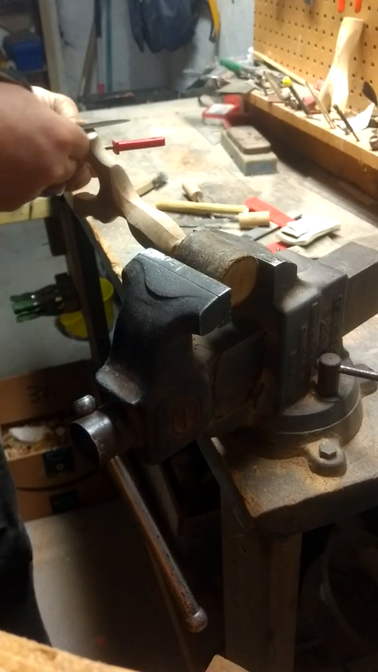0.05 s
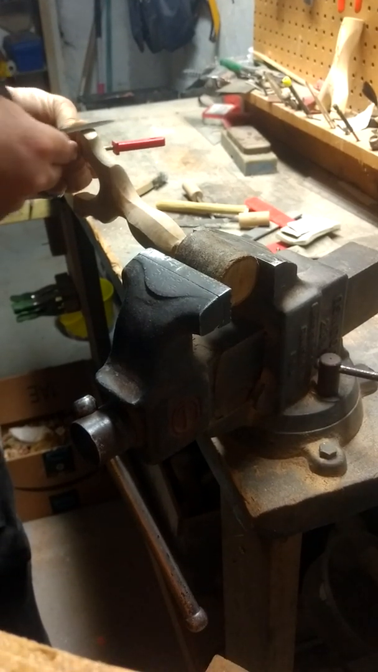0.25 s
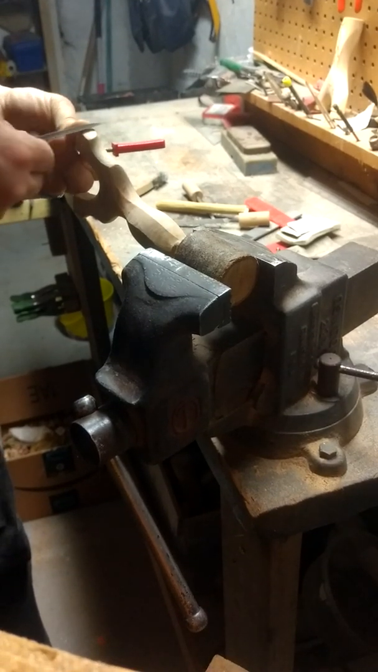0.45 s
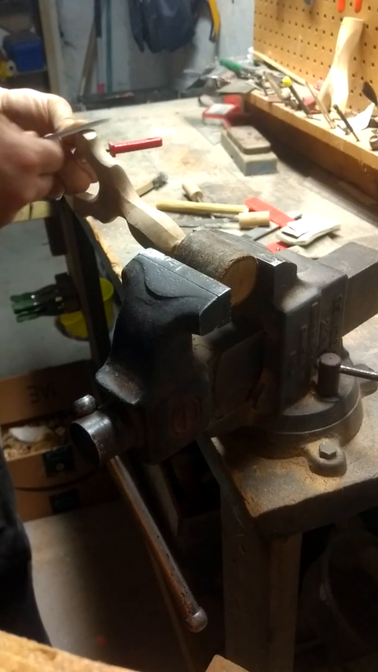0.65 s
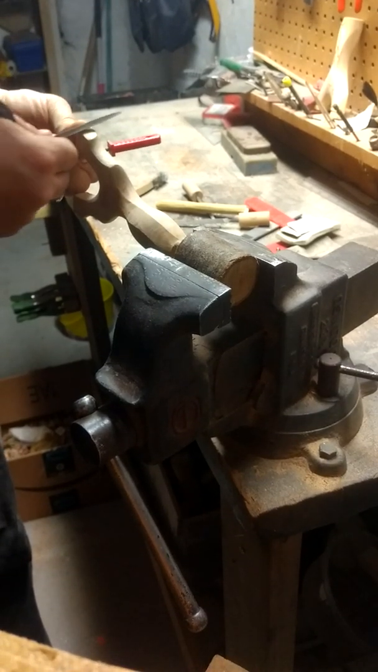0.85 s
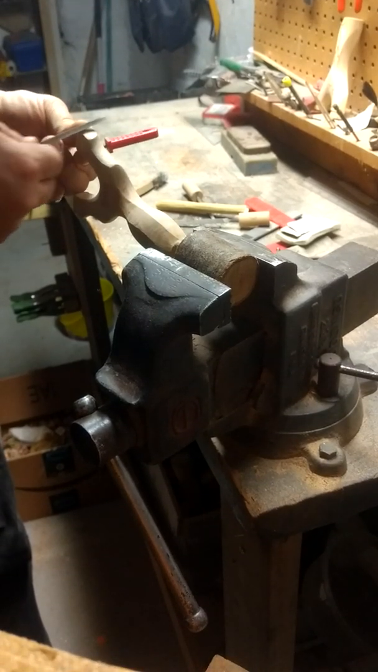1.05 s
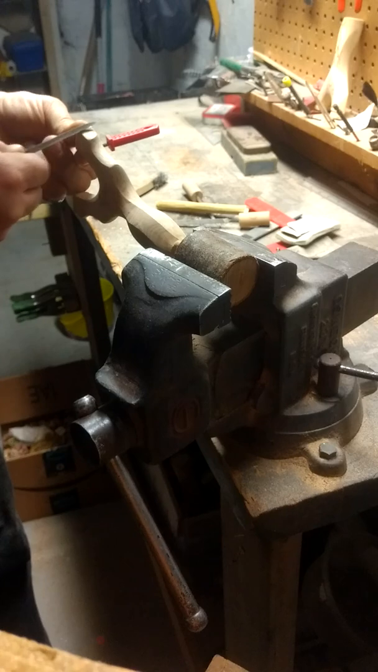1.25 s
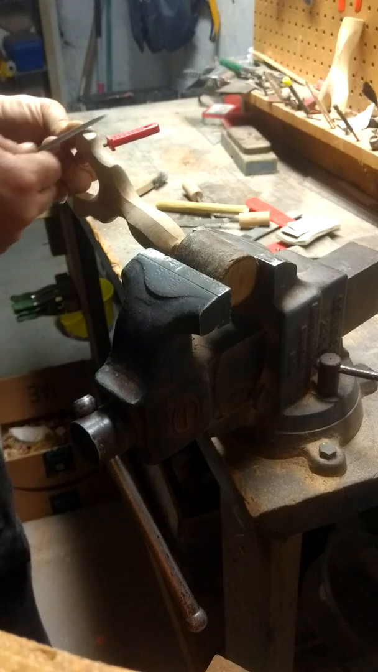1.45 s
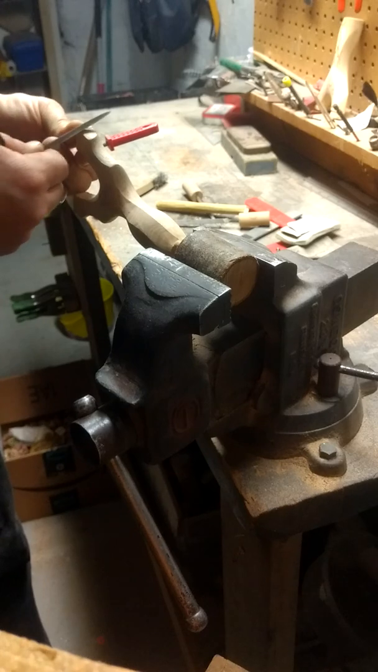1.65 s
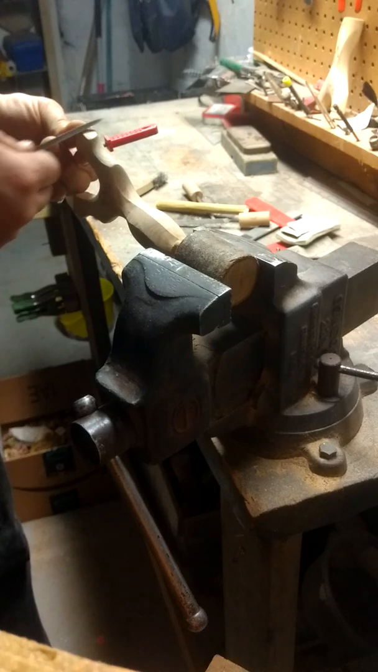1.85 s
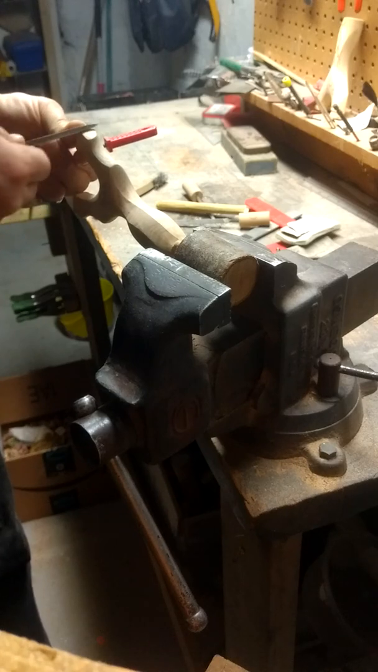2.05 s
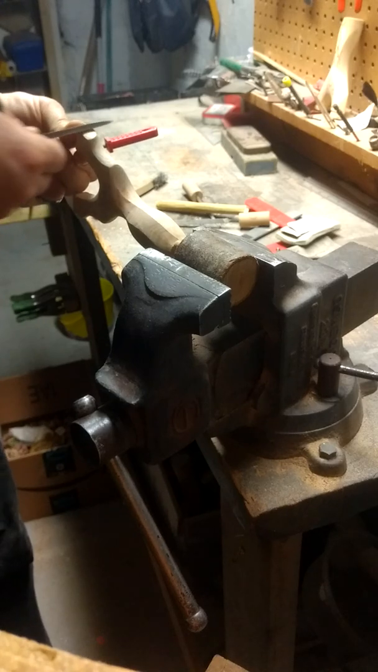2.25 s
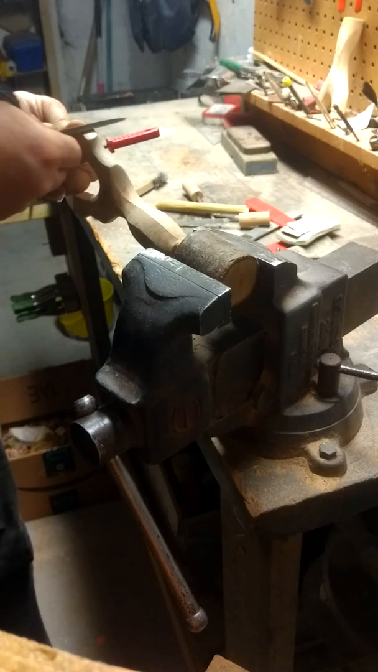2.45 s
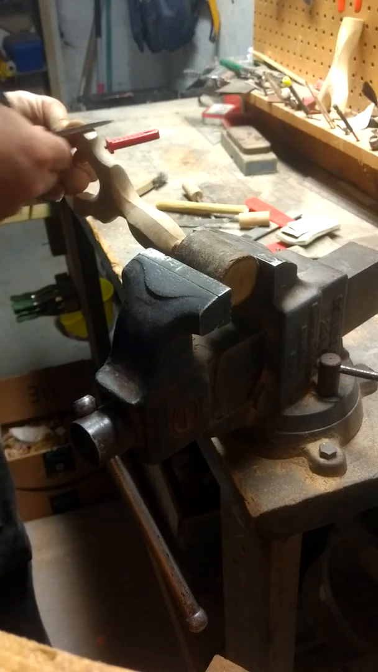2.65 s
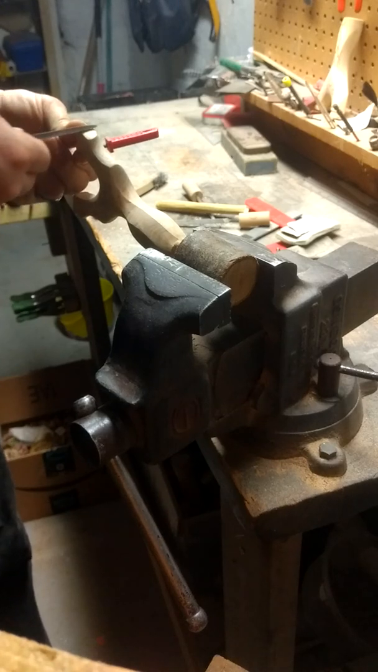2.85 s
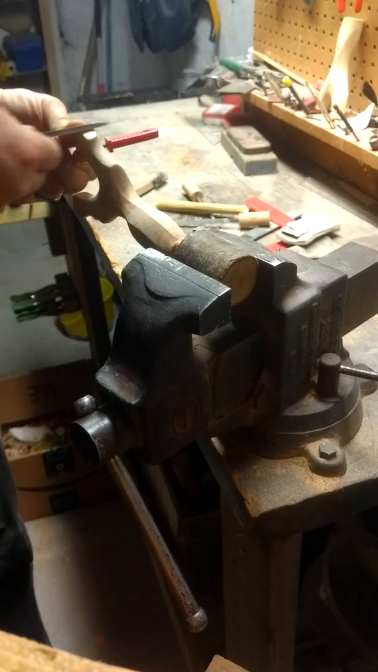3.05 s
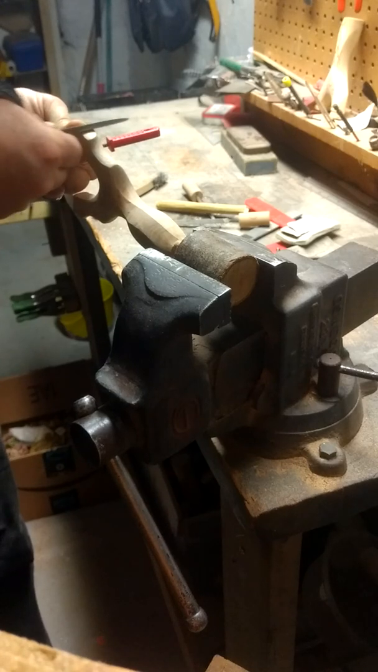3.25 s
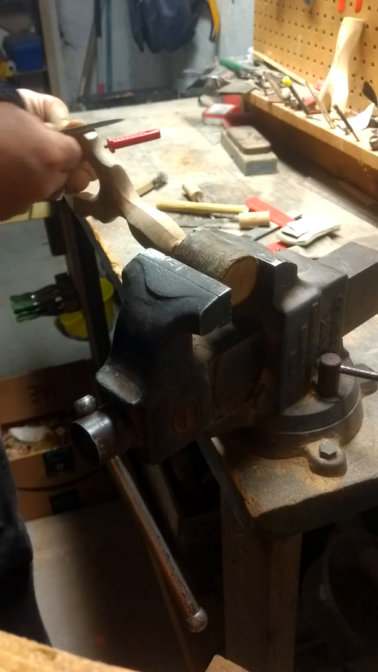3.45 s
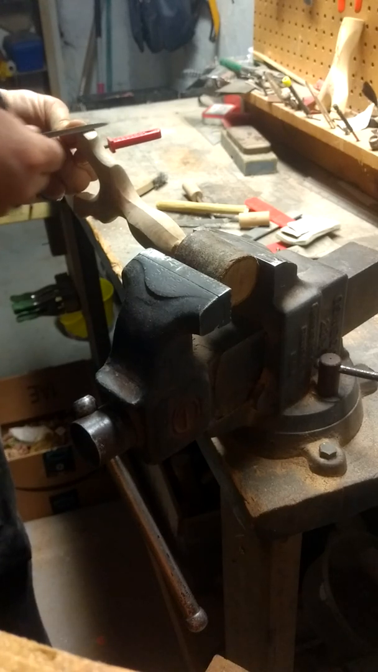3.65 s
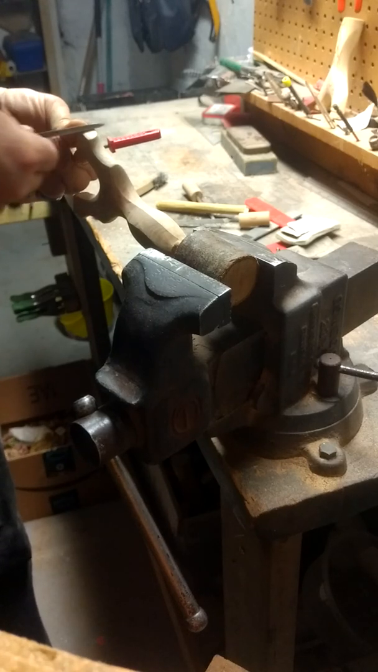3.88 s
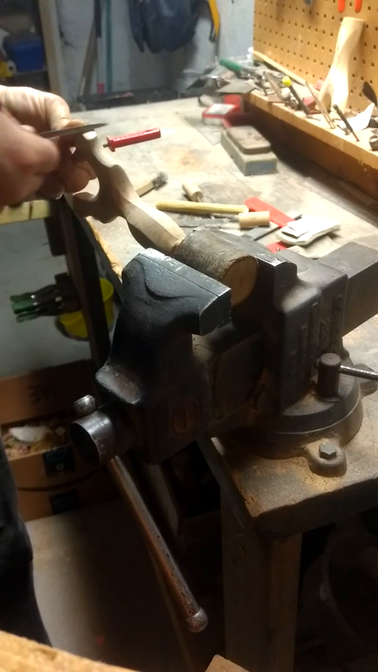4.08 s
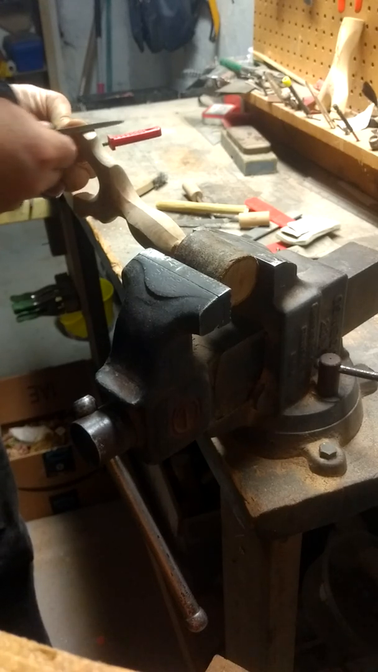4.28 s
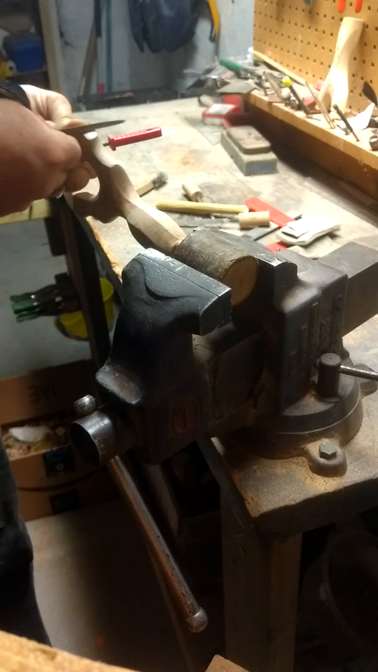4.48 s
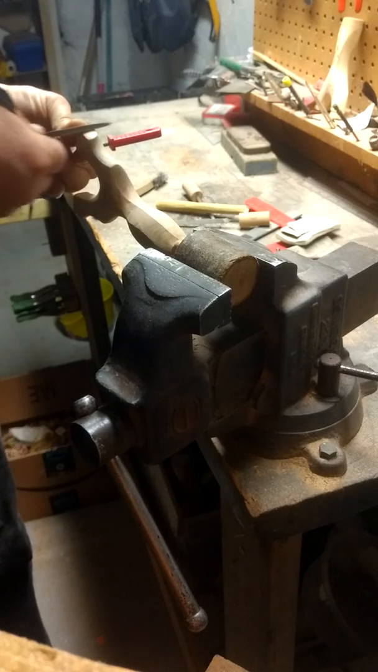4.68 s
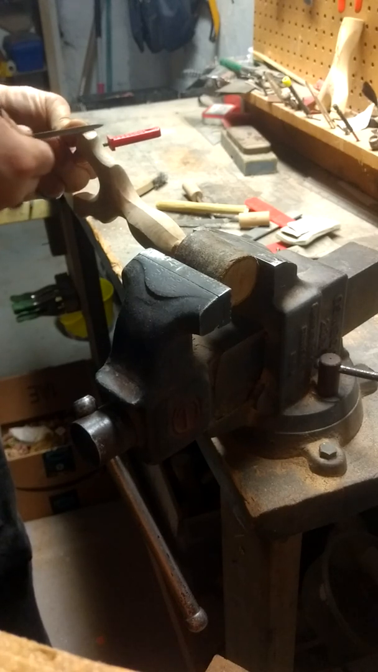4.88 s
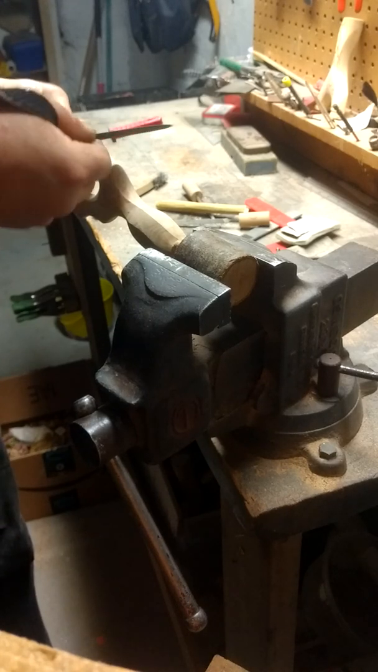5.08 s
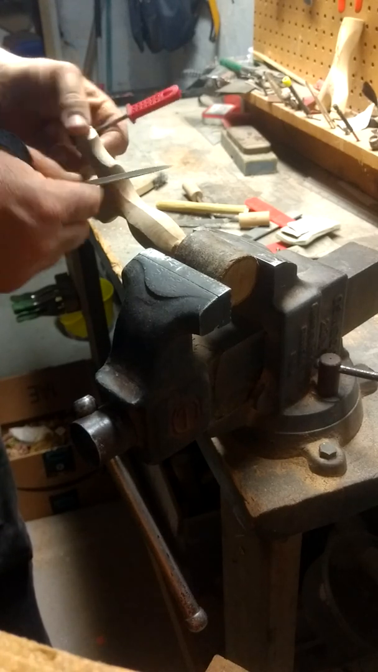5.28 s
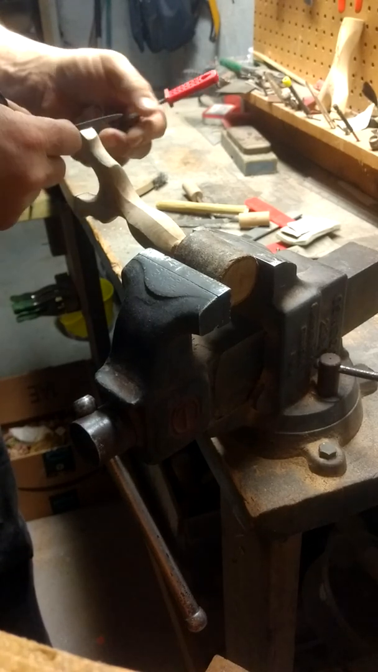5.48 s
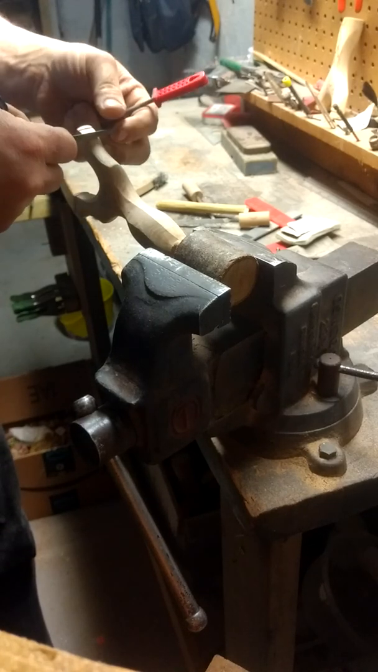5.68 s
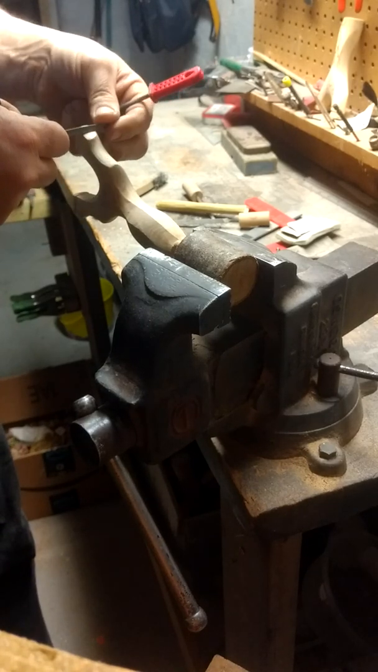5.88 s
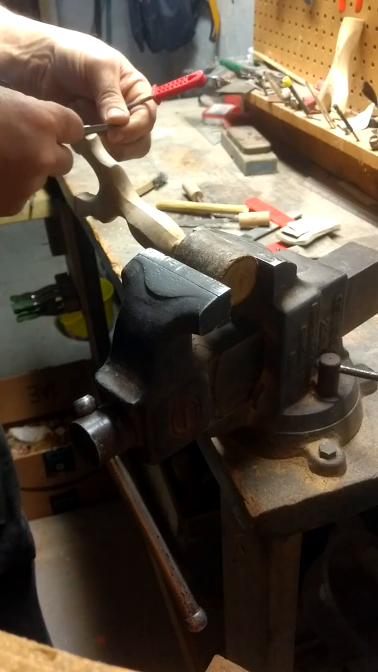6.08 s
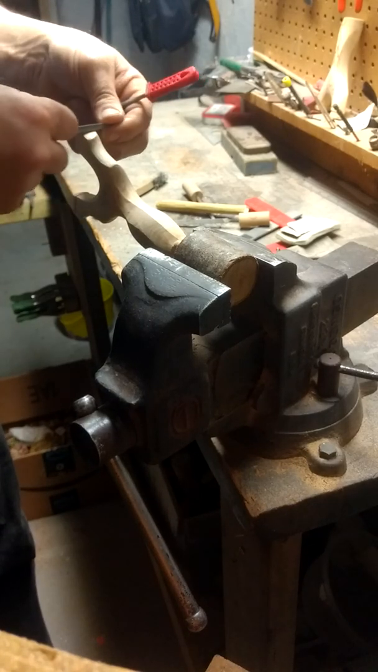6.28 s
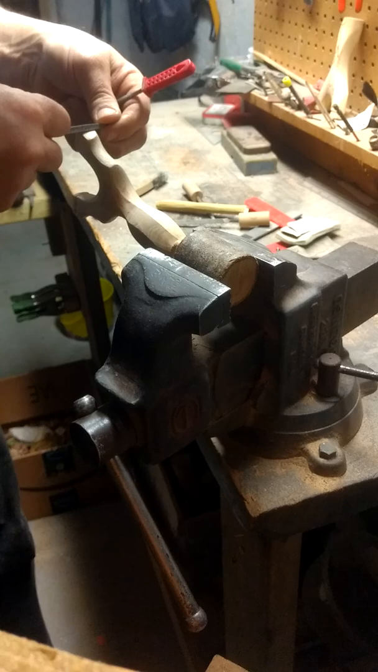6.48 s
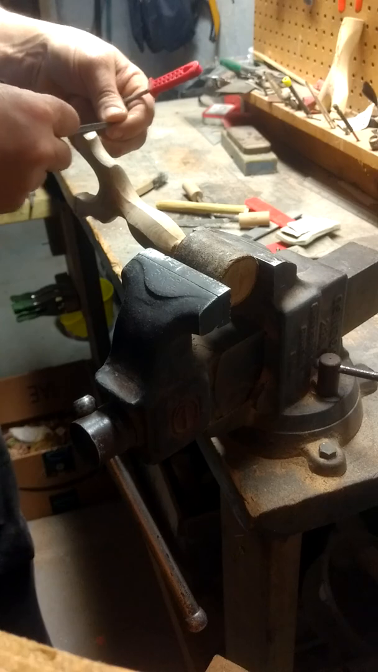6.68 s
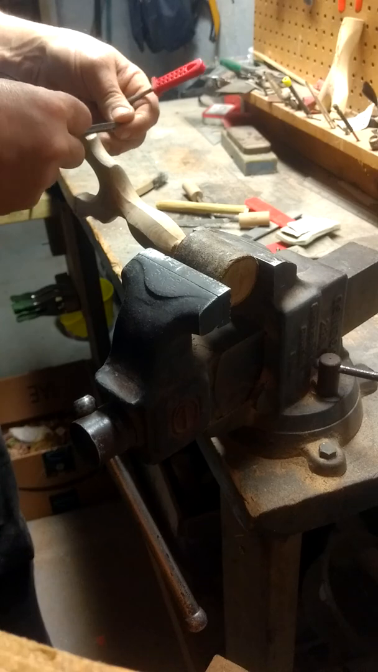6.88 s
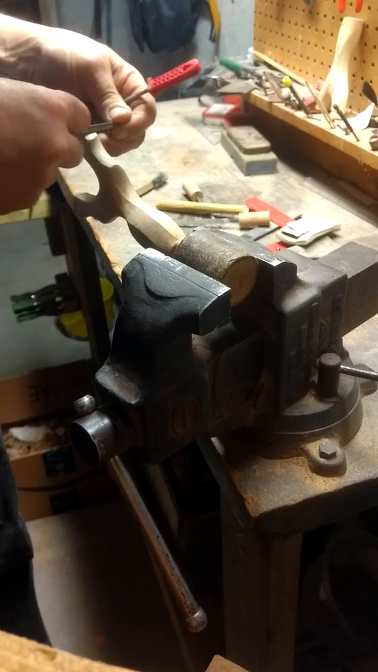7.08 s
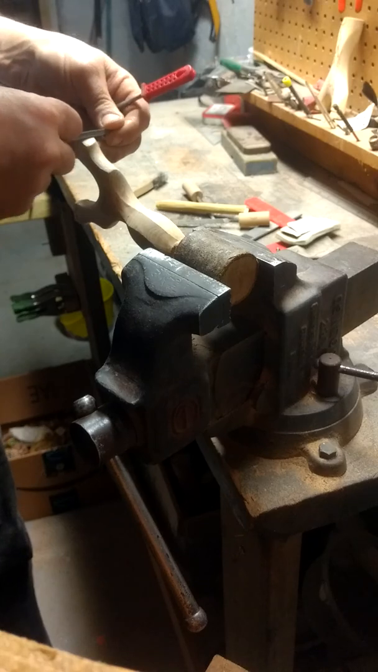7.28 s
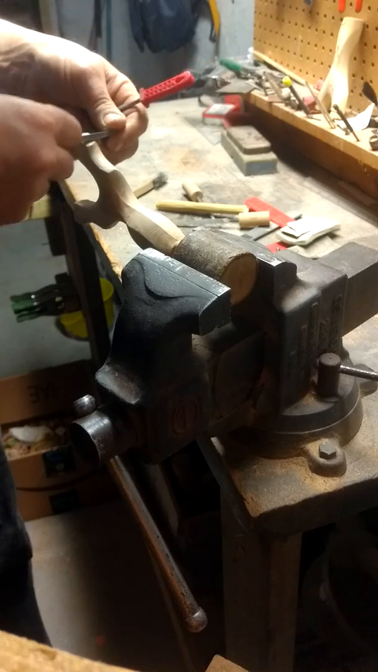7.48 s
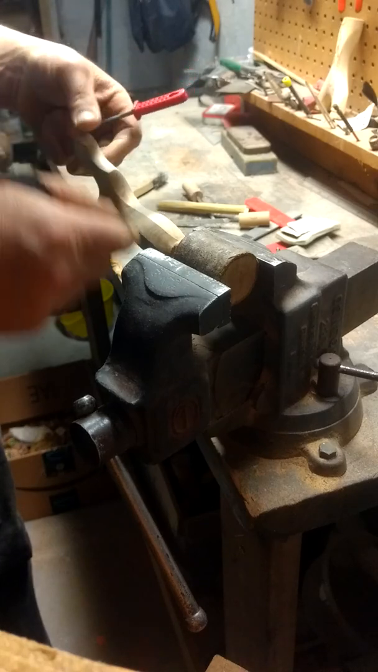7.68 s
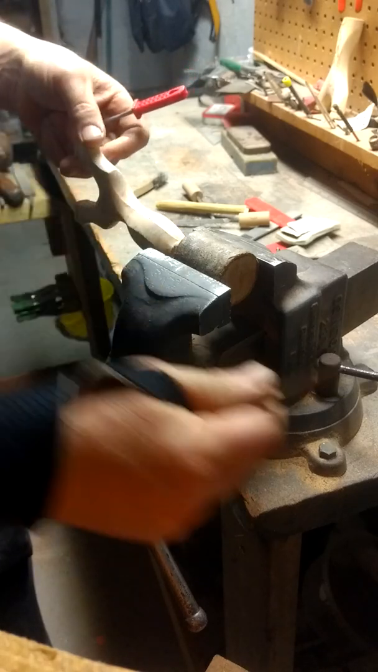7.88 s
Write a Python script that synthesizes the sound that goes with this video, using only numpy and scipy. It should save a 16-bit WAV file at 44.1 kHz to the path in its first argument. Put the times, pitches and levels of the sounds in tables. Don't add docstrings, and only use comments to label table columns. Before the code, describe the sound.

Close in a quiet workshop, a steel file scrapes to and fro on a carved wooden piece held in a vise, about four quick cycles a second. The wood rings hollow with small catches and knocks. After five seconds it stops; fingers slide and tap lightly, then a second, duller and woodier run of filing begins, ending in a soft hand slide.

```python
import sys
import numpy as np
from scipy import signal
from scipy.fft import rfft, irfft, next_fast_len
from scipy.io import wavfile
from scipy.ndimage import uniform_filter1d

SR = 44100
rng = np.random.default_rng(int(sys.argv[2]) if len(sys.argv) > 2 else 0)


def unload_wav(signal):
    wavfile.write(
        sys.argv[1],
        SR,
        np.round(np.clip(np.atleast_2d(signal).T, -1, 1) * 32767).astype(np.int16),
    )


def volts(x):
    e = np.asarray(x, float) / 20
    return 10 ** e


N = 349713
T = np.arange(N) / SR
SIZE = next_fast_len(N + SR)
HZ = np.arange(SIZE // 2 + 1) * SR / SIZE
AT_SECOND_SPOT = T > 5.3
LAST_CYCLE_S = (0.27, 0.29)

# start_s, neck_ring_db, sway_above_ring_db,
# steel_tick_above_ring_db
TAPS = [
    (5.394, -39, -1, -12.5),
    (5.43, -45, -3, -27),
    (5.745, -51, 3.5, -22),
    (5.799, -62, 7, -15),
    (5.902, -66, 8, -6),
    (7.925, -56, 6, -16),
]


def through(x, response):
    return irfft(rfft(x, SIZE) * response, SIZE)[..., :N]


def unit(response):
    return response / np.sqrt(np.mean(np.abs(response) ** 2))


def colour(points):
    hz, db = np.transpose(points)
    return volts(np.interp(np.log(HZ + 1), np.log(hz), db))


def mode(hz, width):
    return 1j * HZ * width / (hz ** 2 - HZ ** 2 + 1j * HZ * width)


def flicker(rate, depth_db):
    hold = int(SR / rate)
    steps = np.repeat(rng.standard_normal(N // hold + 1), hold)[:N]
    return volts(depth_db * uniform_filter1d(steps, hold))


def grit(rate, spread_db):
    excess = np.minimum(rng.exponential(size=N), 3)
    tears = rng.random(N) < rate / SR
    size = volts(spread_db * excess) * rng.standard_normal(N) * tears
    return size / np.sqrt(np.mean(size ** 2))


def strokes():
    # push_start_s, speed_as_rasp_db, push_pressure_db, pull_pressure_db, sway_db
    first_spot = [(0.012, -44, -26, -32.5, -40.5), (0.275, -45.5, -30, -35, -42.5),
                  (0.533, -46.5, -29, -30, -38), (0.802, -45.5, -28.5, -26.5, -37.5),
                  (1.072, -47, -26.5, -32, -35.5), (1.343, -46, -30, -27.5, -39),
                  (1.619, -46, -27.5, -28.5, -36.5), (1.876, -45.5, -28.5, -31, -38),
                  (2.135, -45, -28, -31, -39.5), (2.404, -44, -27.5, -32, -38),
                  (2.664, -43.5, -27.5, -36, -39.5), (2.931, -42.5, -27.5, -30.5, -39),
                  (3.187, -41.5, -26.5, -32, -36), (3.444, -42, -26, -30, -34.5),
                  (3.696, -41.5, -22.5, -30.5, -37), (3.952, -42, -26.5, -31.5, -36.5),
                  (4.21, -41.5, -24.5, -28.5, -36), (4.462, -42.5, -22, -31.5, -36),
                  (4.719, -42.5, -22.5, -30.5, -36), (4.961, -40, -26.5, -99, -41)]
    second_spot = [
        (6.042, -56.5, -36, -35, -37),
        (6.32, -52.5, -28.5, -36.5, -34),
        (6.575, -48.5, -23, -30.5, -29),
        (6.847, -49.5, -24.5, -34, -33),
        (7.106, -49, -23.5, -30.5, -31),
        (7.345, -52.5, -26, -42.5, -33.5),
    ]
    push_share = (0.5, 0.44)
    pull_rasp_db, pull_sway_db = (-2, -7.5), (-2, -5)
    sway_follows = 0.51
    lifted_db = -70
    rows = []
    for spot, table in enumerate((first_spot, second_spot)):
        s, speed_db, push_db, pull_db, sway_db = np.transpose(table)
        cycle = np.diff(s, append=s[-1] + LAST_CYCLE_S[spot])
        push = push_share[spot] * cycle
        rows += zip(s, push, 0 * s, speed_db, push_db, sway_db, spot + 0 * s)
        back_sway_db = sway_db + pull_sway_db[spot] + sway_follows * (pull_db - push_db)
        rows += zip(s + push, cycle - push, 1 + 0 * s, speed_db + pull_rasp_db[spot], pull_db,
                    back_sway_db, spot + 0 * s)
    return np.transpose(sorted(row for row in rows if row[4] > lifted_db))


def by_spot(values):
    _, _, pull, _, _, _, spot = strokes().astype(int)
    values = np.array(values)
    return values[spot] if values.ndim == 1 else values[spot, pull]


def humps(place, db, sharp, rest_db):
    release_s = 0.035
    start, length = strokes()[:2]
    first, count = (start * SR).astype(int), (length * SR).astype(int)
    out = np.zeros(N)
    tail = np.exp(-np.arange(SR // 4) / (release_s * SR))
    rest = volts(rest_db)
    out[:first[0]] = volts(db[0] - 4)
    for s, n, peak, gain, bend in zip(first, count, np.clip(place, 0.1, 0.9), volts(db), sharp):
        angle = np.interp(np.arange(n) / n, [0, peak, 1], [0, np.pi / 2, np.pi])
        out[s:s + n] = gain * (rest + (1 - rest) * np.sin(angle) ** bend)
        out[s + n:s + n + len(tail)] = gain * rest * tail
    return uniform_filter1d(out, 200)


def jolts(times, db, push_ms):
    fade = np.exp(-np.arange(6000) / (push_ms * SR / 1000))
    out = np.zeros(N + len(fade))
    for s, gain in zip(times, volts(db)):
        out[int(s * SR):int(s * SR) + len(fade)] += gain * fade * rng.standard_normal(len(fade))
    return out[:N]


def snags(times, db):
    out = np.zeros(N)
    out[(times * SR).astype(int)] = volts(db) * rng.choice([-1, 1], len(times))
    return out


def shop():
    # pitch_hz, level_db
    air_colour = [(25, -22.5), (60, 8), (200, 5.5), (500, -3), (1300, -6), (1800, -20.5), (9000, -33.5),
                  (16000, -31)]
    # pitch_hz, level_db
    tones = [(10621, -104), (12161, -96), (12931, -100), (13582, -99), (14002, -95)]
    air_db, left_bass_db, right_treble_db = -55.5, 5, 5.5
    lean_db = np.interp(np.log(HZ + 1), np.log([250, 700, 5000, 9000]), [left_bass_db, 0, 0, -right_treble_db])
    lean = volts(np.array([lean_db, -lean_db]) / 2)
    air = through(rng.standard_normal((2, N)), unit(colour(air_colour)) * lean)
    whine = sum(volts(db) * np.sin(2 * np.pi * hz * T) for hz, db in tones)
    return volts(air_db) * air * flicker(0.91, 0.45) + whine


def rasp():
    # pitch_hz, width_hz, level_over_rasp_db
    steel_modes = [(1780, 120, -6.5), (2090, 17, 12), (2496, 107, 8), (3033, 25, 5.5), (3423, 103, 10),
                   (4615, 110, 14), (3737, 96, 6.5), (5870, 180, 3), (6430, 350, 12.5), (7650, 110, 8.5),
                   (8280, 350, 10.5), (7907, 71, 16.5), (9850, 220, 3.5), (12290, 350, 7.5)]
    # pitch_hz, level_db_per_hz
    rasp_colour = [(60, -24), (900, 3), (2300, 4.5), (4600, -6), (6500, -22.5), (7200, -27), (10700, -35.5),
                   (15000, -35)]
    fastest = by_spot(((0.39, 0.43), (0.5, 0.49)))
    speed_db = strokes()[3]
    speed = humps(fastest, speed_db + 5.5, sharp=by_spot((1.66, 1.76)), rest_db=-19.0)
    force = speed * grit(12000, 2.4) * flicker(70, 1.9)
    dulled = through(force * AT_SECOND_SPOT, 1 / (1 + (HZ / 11400) ** 4))
    force = force * ~AT_SECOND_SPOT + dulled
    tap_s, tap_db, _, tick_db = np.transpose(TAPS)
    force = force + np.diff(jolts(tap_s, tap_db + tick_db + 11.5, push_ms=19), prepend=0)
    steel = 0
    for hz, width, db in steel_modes:
        contact = flicker(22, 1.9) * flicker(7, 1.47)
        steel = steel + through(force * contact, mode(hz, width) * (volts(db) - 1))
    return through(force + steel, unit(colour(rasp_colour)))


def upper_share():
    # time_s, share_of_upper_bending_0_to_1
    bearing = [(0.0, 0.26), (0.6, 0.56), (1.14, 0.24), (1.4, .55), (2.0, 0.39), (2.5, 0.69), (3.0, 0.58),
               (3.3, 0.44), (3.75, 0.7), (4.1, 0.57), (4.55, 0.49), (5.05, 0.42), (5.2, .8), (6.1, 0.93),
               (6.65, 0.44), (7.0, .55), (7.3, 0.81), (7.7, 0.67)]
    swing = np.where(AT_SECOND_SPOT, 0.25, 0.06)
    lowest_at = 0.22
    start, _, pull, *_ = strokes()
    pushes = start[pull == 0]
    turns = np.interp(T, pushes, np.arange(len(pushes)))
    turns = turns + np.maximum(T - pushes[-1], 0) / LAST_CYCLE_S[1]
    share = np.interp(T, *np.transpose(bearing)) - swing * np.cos(2 * np.pi * (turns - lowest_at))
    return np.clip(share, 0.1, 0.9)


def ring(force, modes):
    out = 0
    for spot, part in enumerate((force * ~AT_SECOND_SPOT, force * AT_SECOND_SPOT)):
        body = 0
        for k, (hz, width, *spot_db, lean_db) in enumerate(modes):
            gain = volts(spot_db[spot] + np.array([[lean_db], [-lean_db]]) / 2)
            body = body + (-1) ** k * gain * mode(hz, width)
        out = out + through(part, unit(body))
    return out


def wood():
    # start_s, neck_ring_db, sway_above_ring_db
    catches = [(0.039, -24.5, -20), (0.204, -27, -13), (0.589, -25, -9), (0.987, -22, -8),
               (1.14, -14.5, -16), (1.387, -23, 8), (1.436, -21, -16), (1.507, -24, 3), (1.645, -21.5, 4),
               (1.79, -36, -15), (1.912, -24.5, -16), (2.08, -19.5, -18), (2.226, -22.5, -13),
               (2.491, -15, -27), (2.564, -21.5, -1), (2.688, -20, -7), (3.228, -20.5, -1), (3.474, -28, 7),
               (3.725, -26, 7), (3.999, -25, -17), (4.373, -26, -11), (4.51, -15, -20), (4.557, -17, -6),
               (4.748, -23.5, 6), (5.014, -18, -2), (6.378, -24, 8), (6.625, -15, -13), (6.894, -17.5, 6),
               (7.128, -36, -4), (7.387, -15.5, 0)]
    # pitch_hz, width_hz, first_spot_db, second_spot_db, left_minus_right_db
    sway_modes = [(81, 13, -5, -18.5, 3.5), (127, 6.5, -40, -16.5, -1.5), (186, 20.7, -7.5, -11, -5.5),
                  (226.3, 30.7, 2, -1.5, 4.5), (261.6, 14, -3, -3.5, 4.5), (287.8, 14.2, -1, 0.5, 4.5),
                  (340, 17, -7, -8.5, 4)]
    low_modes = [(347, 99, -32, -15.5, -6), (441.6, 10.2, -16, -15, -7.5), (477.3, 7.8, -17.5, -9, 4.5),
                 (565.7, 19.4, -1, 2, -3.5), (595.4, 31.3, -18.5, -1, -0.5), (1206, 480, -36, -22.5, -2)]
    high_modes = [(619.8, 49, 4, 1, -0.5), (669.3, 30.6, 7, 10, 5), (678.4, 12, -17, 15, 1.5),
                  (690.5, 12.5, 4, 4, -3.5), (724.4, 8.8, 0.5, -22, -14), (764, 12, -5, -3, -11.5),
                  (856, 17, -6, -2, -2.5), (890, 25, -12, -14.5, -13), (1103, 61, -15.5, -26, -14),
                  (1217, 37, -18.5, -18.5, -4.5), (1510, 33, -24.5, -51, -4.5), (2070, 67, -47, -37, 3)]
    hardest = by_spot(((0.51, 0.19), (0.74, 0.087)))
    stick_s, stick_db = 0.016, -6.5
    turn_knock_s, turn_knock_db = 0.03, by_spot((15, 8.5))
    start, _, _, _, neck_db, sway_db, _ = strokes()
    s, catch_db, catch_sway_db = np.transpose(catches)
    s = s - 0.004027
    tap_s, tap_db, tap_sway_db, _ = np.transpose(TAPS)

    load = humps(hardest, neck_db - 3.5, sharp=by_spot((0.84, 1.8)), rest_db=-8.0)
    load = np.roll(load, int(0.0096 * SR))
    load[:int(0.0083 * SR)] = load[int(0.0083 * SR)]
    until = s[:, None] - T[::32]
    stuck = ((until > 0) & (until < stick_s)).any(axis=0)
    load = load * np.repeat(volts(stick_db * stuck), 32)[:N]
    tugs = snags(s, catch_db + 23) + jolts(s, catch_db - 11.5, push_ms=3.6)
    tugs = through(tugs, mode(540, 220))
    neck = load * grit(1500, 1.2) * flicker(40, 0.39) + tugs + jolts(tap_s, tap_db, push_ms=24.0)

    sway = humps(by_spot((0.2, 0.45)), sway_db + 4.0, sharp=by_spot((0.9, 0.9)), rest_db=-9.5)
    sway = np.roll(sway, int(0.018 * SR))
    sway[:int(0.015 * SR)] = sway[int(0.015 * SR)]
    sway = sway * grit(800, 2.2) * flicker(25, 2.0)
    knocks = snags(s, catch_db + catch_sway_db + 18.0)
    knocks = knocks + snags(start + turn_knock_s, sway_db + turn_knock_db + 21.5)
    sway = sway + through(knocks, mode(240, 120)) + jolts(tap_s, tap_db + tap_sway_db, push_ms=44)

    high = upper_share()
    rock = flicker(16, 2.13)
    low_ring = ring(neck * np.sqrt(1 - high) / rock, low_modes)
    high_ring = ring(neck * np.sqrt(high) * rock, high_modes)
    return low_ring + high_ring + ring(sway, sway_modes)


def lift_off():
    start_s, rise_s, level_db = 5.05, 0.041, -38.5
    t = np.maximum(T - start_s, 0) / rise_s
    drag = volts(level_db) * t * np.exp(1 - t) * rng.standard_normal(N)
    return through(drag, unit(mode(840, 150) ** 2))


def fingers():
    # start_s, level_db, fade_db_per_s
    slides = [
        (5.1, -47.5, -26),
        (5.4, -67.5, -45),
        (5.64, -68, -150),
        (5.885, -61, -130),
        (7.54, -52.5, -150),
        (7.679, -57.5, -12),
    ]
    # pitch_hz, level_db
    skin_colour = [(600, 13), (1300, 9.5), (2200, -1), (3600, 5), (5200, -3.5), (7000, -20), (12000, -33.5)]
    level = sum((T > s) * volts(db + fade_db * np.maximum(T - s, 0)) for s, db, fade_db in slides)
    hiss = uniform_filter1d(level, 900) * grit(7200, 0.64) * flicker(18, 0.96)
    return through(hiss, unit(colour(skin_colour)))


def walls(t60_low, t60_high, split_hz):
    t = np.arange(SR // 2) / SR
    low = 1 / (1 + (HZ / split_hz) ** 2)
    tails = []
    for t60 in (t60_low, t60_high):
        echoes = rng.standard_normal((2, len(t))) * volts(-60 * t / t60) * (t > 0.003)
        tails.append(rfft(echoes, SIZE))
    return unit(low * tails[0] + (1 - low) * tails[1])


def scene():
    # pitch_hz, level_db
    scatter = [(500, -5), (3500, -9), (5500, -3.5), (7000, 2), (8500, -4.5), (15000, -2)]
    scatter_lean = volts(np.array([[7.5], [-7.5]]) / 2)
    near = np.array([volts(-45.5) * np.exp(-2j * np.pi * HZ * 0.00006), np.ones(len(HZ))])
    radiates = (HZ / 120) ** 2 / (1 + (HZ / 120) ** 2)
    radiates = radiates / (1 + (HZ / 2500) ** 4)
    room = walls(t60_low=0.23, t60_high=0.14, split_hz=2720) * HZ / (HZ + 300)
    body = through(wood() + lift_off(), radiates * (1 + volts(-6.0) * room))
    scrape = through(rasp() + fingers(), unit(near + colour(scatter) * scatter_lean * room))
    return body + scrape + shop()


def low_pass(x):
    return signal.sosfilt(signal.butter(12, 16460, fs=SR, output="sos"), x)


def record(dry):
    share, lag_samples, top_hz = 0.72, 20, 15760
    spare_bass = (HZ / 300) ** 2 / (1 + (HZ / 300) ** 2)
    cross = share * np.exp(-2j * np.pi * HZ * lag_samples / SR) * spare_bass
    wide = volts(1.0) * through(dry - through(dry[::-1], cross), HZ < top_hz)
    wide = wide + np.array([[0.00783], [-0.0003]])
    return low_pass(wide)


dry = scene()
out = record(dry)
unload_wav(out)
```